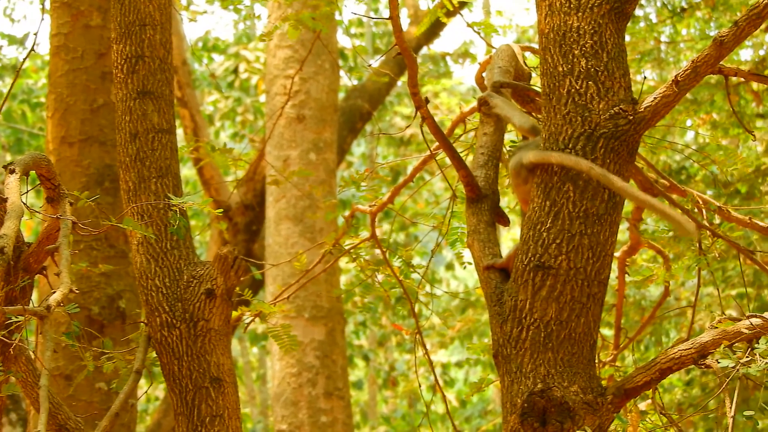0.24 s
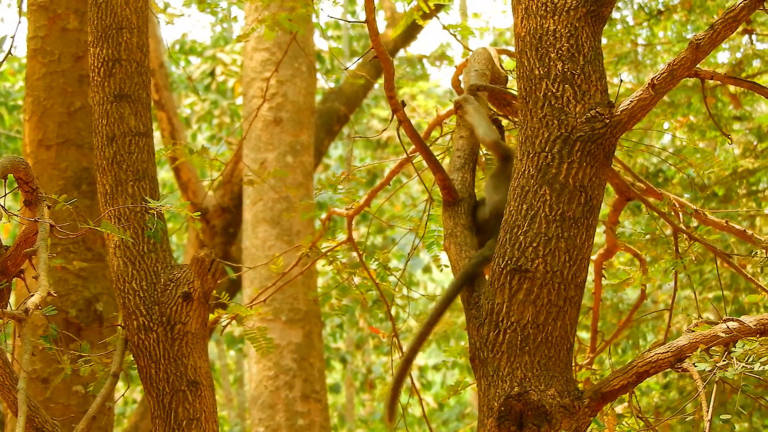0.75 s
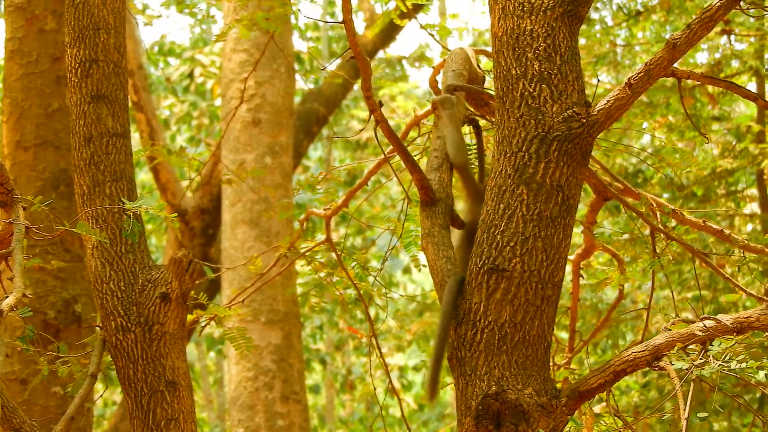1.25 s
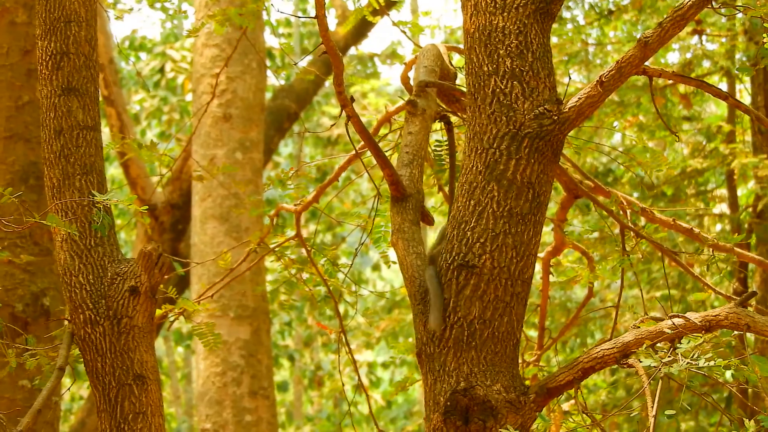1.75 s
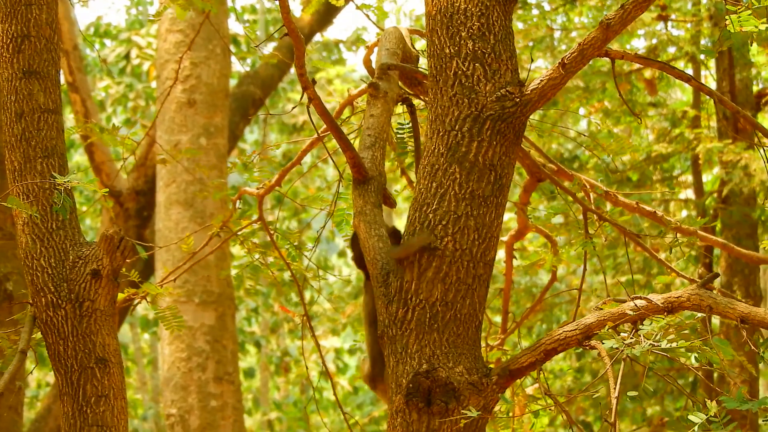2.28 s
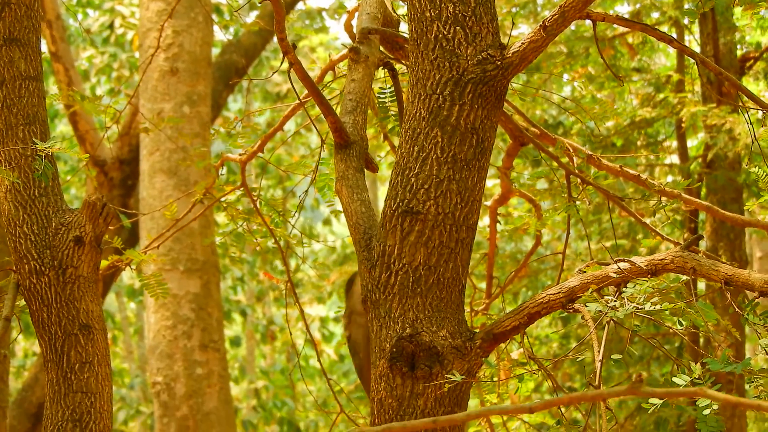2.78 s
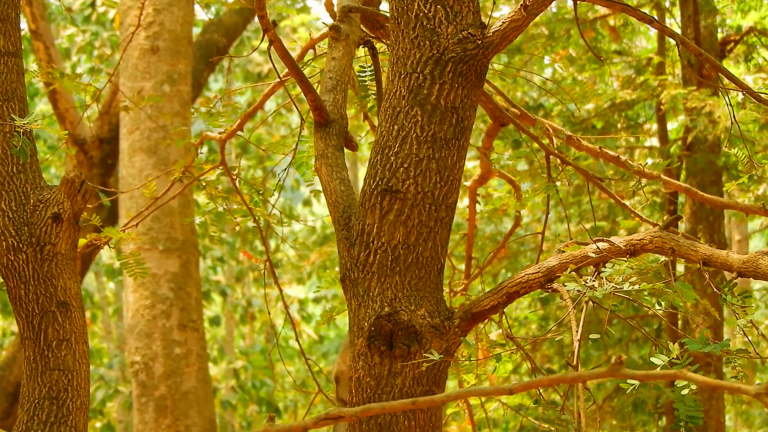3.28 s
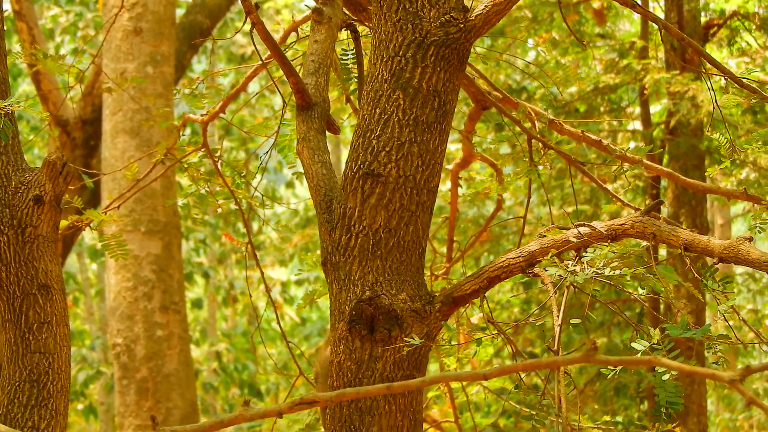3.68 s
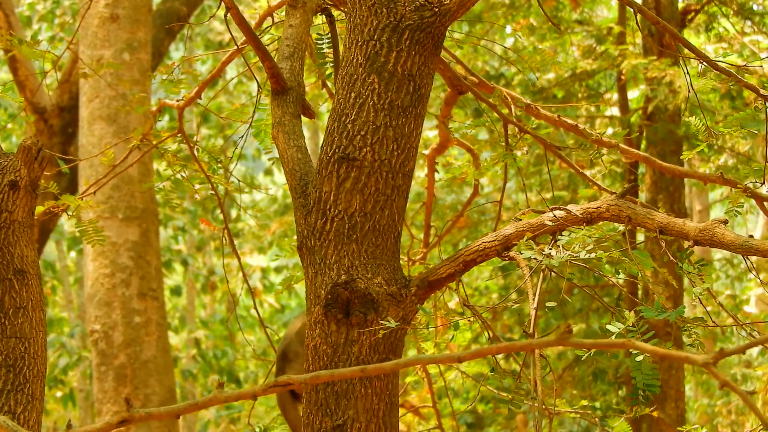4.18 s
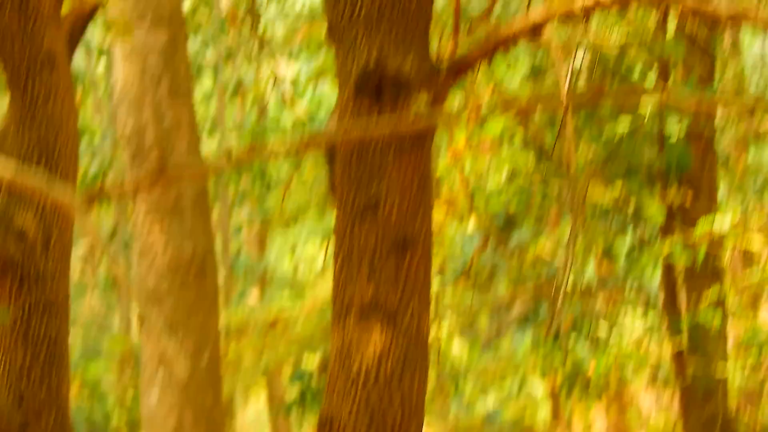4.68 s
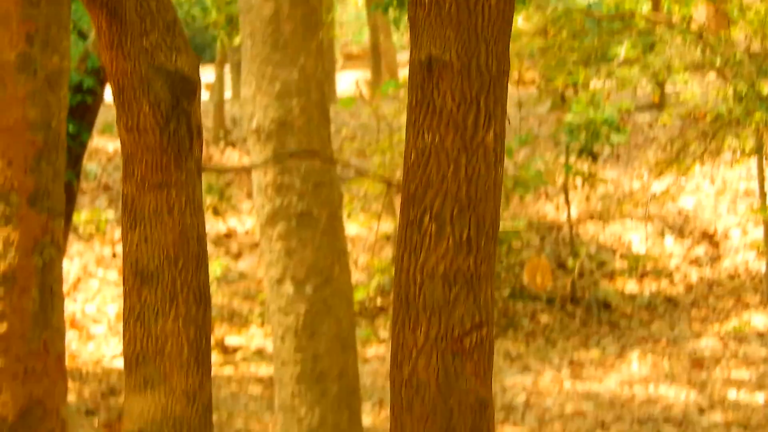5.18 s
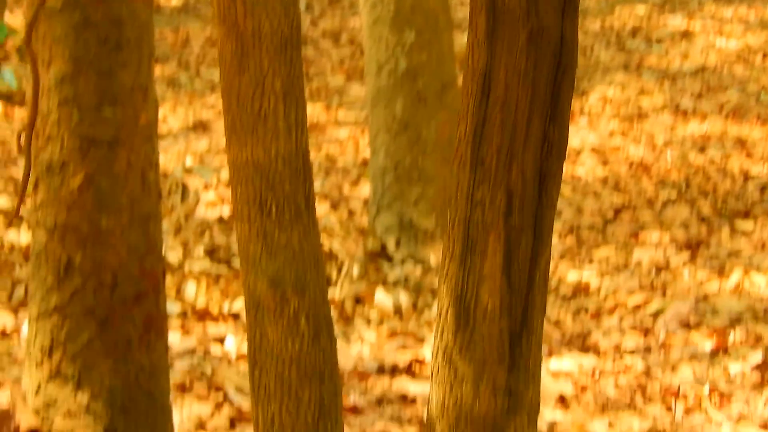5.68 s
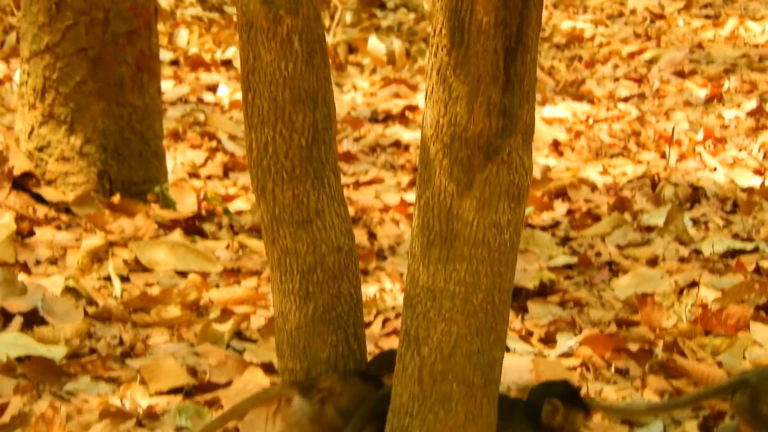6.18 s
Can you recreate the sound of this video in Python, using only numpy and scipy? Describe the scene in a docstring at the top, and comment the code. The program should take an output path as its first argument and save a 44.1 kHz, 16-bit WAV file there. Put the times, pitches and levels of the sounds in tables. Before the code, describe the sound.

In a dry forest, one close cicada buzzes continuously slightly left, within a wide, shrill wash of distant insects. A far engine throbs beneath low rumble and faint road noise. Unseen monkeys rustle foliage; a sharp cluster of twig snaps and leaf crunches comes early, then scattered smaller crackles and a late snap. A handheld stereo microphone catches soft air and one low handling bump.

```python
"""Cicadas in a dry forest

One cicada buzzes close by on the left: quick clicks ring a small drum-like skin, the tymbal.
Far insects, made of smeared clicks, noise and thin tones, merge into a shrill wash.
Spaced thumps make a far engine; shaped noise makes rumble, air, road, wind and one low handling bump.
Monkeys moving about rustle foliage, crunch leaves and snap twigs: short swells of noise, with leaf ticks.
"""
import sys
import numpy as np
from scipy import signal
from scipy.fft import rfft, irfft
from scipy.io import wavfile
from scipy.ndimage import uniform_filter1d

SR = 44100
rng = np.random.default_rng(int(sys.argv[2]) if len(sys.argv) > 2 else 0)


def master_out(mix):
    """Clip the mix to full scale and print it as 16-bit PCM to the path in sys.argv[1]."""
    frames = np.transpose(np.atleast_2d(mix))
    ceiling = np.clip(frames, -1, 1)
    pcm = np.round(ceiling * 32767).astype(np.int16)
    wavfile.write(sys.argv[1], SR, pcm)


N = 284004
TIME = np.arange(N) / SR  # s
FREQ = np.maximum(np.arange(N // 2 + 1) * SR / N, 1)  # Hz


def undb(db):
    """Turn decibels into gain."""
    return 10 ** (np.asarray(db) / 20)


def curves(table):
    """Join the points of each table column by straight lines in time."""
    s, *columns = np.transpose(table)
    return [np.interp(TIME, s, column) for column in columns]


def unit(x):
    """Scale so that the middle of the stereo image has an rms level of 1."""
    return x / np.std(np.atleast_2d(x).mean(axis=0))


def pan(db):
    """Give the gains of left and right for a level difference, left minus right."""
    return undb(np.array([[db], [-db]]) / 2)


def colour(points):
    """Draw a frequency response through points of pitch and level."""
    hz, db = np.transpose(points)
    return undb(np.interp(np.log(FREQ), np.log(hz), db))


def resonance(hz, width):
    """Let one band of pitches through, twice over for steep sides; width is that of a single pass."""
    return (1 + 1j * (FREQ / hz - hz / FREQ) * hz / width) ** -2


def joint_resonance(table):
    """Add the power of several resonances, leaving out their phase so that they sound together."""
    return np.sqrt(sum(np.abs(undb(db) * resonance(hz, width)) ** 2 for hz, width, db in table))


def filtered(x, response):
    """Apply a frequency response."""
    return irfft(rfft(x) * response, N)


def walk(rate):
    """Wander by chance: random levels, `rate` a second, smoothed twice; spread near 1."""
    hold = int(SR / rate)
    steps = np.repeat(rng.standard_normal(N // hold + 1), hold)
    smooth = uniform_filter1d(uniform_filter1d(steps, hold), hold)
    return 1.3 * smooth[:N]


def wide_noise(side_db):
    """Make stereo noise; side_db sets the left-right difference against the shared middle."""
    mid, side = rng.standard_normal((2, N))
    return mid + undb(side_db) * side * np.array([[1], [-1]])


def pulses(rate, jitter_s, scatter_db):
    """Make one pulse a cycle, each a little early or late and of its own size."""
    turns = np.cumsum(rate) / SR
    times = np.interp(np.arange(1, turns[-1]), turns, TIME)
    late, size = rng.standard_normal((len(times), 2)).T
    place = (times + jitter_s * late)[:, None] * SR
    # a short sinc places each pulse between samples
    taps = place.astype(int) + np.arange(-4, 6)
    out = np.zeros(N)
    np.add.at(out, taps % N, undb(scatter_db * size)[:, None] * np.sinc(taps - place))
    return out


def trunks(x, t60):
    """Blur a sound into echoes from the trees, different on each side, fading 60 dB in t60 seconds."""
    tail = rng.standard_normal((2, N)) * undb(-60 * TIME / t60)
    return unit(filtered(x, rfft(tail)))


def reflections(db, count):
    """Add fixed echoes off trunks to the direct sound, which combs the spectrum finely."""
    lag_s, size = rng.uniform(.006, .05, count), rng.standard_normal(count)
    response = np.zeros(N)
    response[0] = 1
    response[(lag_s * SR).astype(int)] = undb(db) * size / np.linalg.norm(size)
    return rfft(response)


def drifting(x, spread_hz):
    """Let the pitch of a narrow sound wander up and down."""
    turns = np.cumsum(spread_hz * walk(5)) / SR
    return np.real(signal.hilbert(x) * np.exp(2j * np.pi * turns))


# tone of the low rumble: f/Hz, relative level per Hz/dB
RUMBLE_TONE = [(20, -23), (32, -17), (45, -5), (54, -11), (70, 1), (110, -1.5), (140, 1.5), (175, .5),
               (205, -2), (260, -13), (400, -21.5), (800, -56)]
# the rumble sinks and comes back: t/s, level/dB
RUMBLE_LEVEL = [(0, -34.5), (2.3, -35.5), (3.5, -38), (5.3, -37.5), (6.44, -35)]


def low_rumble():
    """Bass-heavy noise, nearly the same on both sides."""
    db, = curves(RUMBLE_LEVEL)
    return unit(filtered(wide_noise(side_db=-16.0), colour(RUMBLE_TONE))) * undb(db)


# tone of the rush of air: f/Hz, relative level per Hz/dB
AIR_TONE = [(100, -3), (280, 2), (450, 1.5), (780, 0.5), (1100, -2.5), (1700, -4.5), (2800, -7.5),
            (4000, -11.5), (8000, -16.5)]
AIR_DB = -45  # level around which it wavers


def air_rush():
    """Soft, wide noise whose level wavers quickly."""
    return unit(filtered(wide_noise(side_db=-5.5), colour(AIR_TONE))) * undb(AIR_DB + 2.6 * walk(14))


# tyre noise ebbing on a far road: t/s, level/dB
ROAD_LEVEL = [(0, -43), (1, -45), (2, -47), (2.3, -51.5), (2.9, -47.5), (3.5, -60), (4.2, -55), (4.75, -57),
              (4.95, -50), (5.6, -56.5), (6.44, -56)]


def far_road():
    """Tyre noise is a broad band of noise around 772 Hz, with a wavering level."""
    db, = curves(ROAD_LEVEL)
    return unit(filtered(wide_noise(side_db=-12.5), resonance(772, 560))) * undb(db + 1.3 * walk(6.4))


def background():
    """Rumble, air and road together; trunks echo only the air and the road."""
    echoed = filtered(air_rush() + far_road(), reflections(db=-5.5, count=30))
    return (low_rumble() + echoed) * pan(2.4)


# low tone of both the wind and the bump on the microphone: f/Hz, relative level per Hz/dB
BUFFET_TONE = [(15, -26), (28, -17), (45, -4), (70, -1.5), (110, -6), (200, -32)]
DRAUGHT_DB, BUMP_DB = -51, -35  # light steady draught; top of the bump; both waver
BUMP_S, BUMP_RISE_S, BUMP_FALL_S = 4.88, 0.18, 0.088  # time of the top; slow build; fast drop


def wind_and_bump():
    """A draught buffets each side of the microphone on its own; one low bump comes as it is handled."""
    age = TIME - BUMP_S
    bump = undb(BUMP_DB) * np.exp(-np.maximum(-age / BUMP_RISE_S, age / BUMP_FALL_S))
    strength = np.hypot(undb(DRAUGHT_DB), bump) * undb(2 * walk(2.18))
    return unit(filtered(rng.standard_normal((2, N)), colour(BUFFET_TONE))) * strength


# level of the far engine: t/s, level/dB
ENGINE_LEVEL = [(0, -32.5), (1, -36), (2.5, -33), (3.3, -37), (4.5, -34.5), (5.7, -43), (6.44, -34.5)]
# resonances of its exhaust: f/Hz, width/Hz, relative level/dB
EXHAUST = [(65.7, 9.7, -1), (126.8, 58, 9.5), (157, 29, -21)]
FIRINGS_HZ, FIRINGS_WAVER = 21.8, .005  # firings per second; small share by which they waver


def engine():
    """Slow firings thump through the exhaust; distance leaves only the bass."""
    db, = curves(ENGINE_LEVEL)
    pipe = sum(undb(d) * resonance(hz, width) for hz, width, d in EXHAUST)
    rate = FIRINGS_HZ * (1 + FIRINGS_WAVER * walk(1))
    firings = pulses(rate, jitter_s=0.00022, scatter_db=0.9)
    return unit(filtered(firings, pipe)) * undb(db) * pan(1.31)


# click rates of the far cicadas, one each, around which they wander: f/Hz
CROWD_RATES = [402.4, 394, 341.6, 312.7, 269, 414.4, 357.3, 232, 373.4, 292, 387, 409, 328, 249]
CROWD_WAVER = .016  # share by which each rate slowly wanders
# pitches on which the far insects sing: f/Hz, width/Hz, relative level/dB
SONGS = [(4926, 120, -11.5), (5090, 130, -12.5), (5750, 110, -8.5), (5916, 280, -8), (6133, 136, -7.5),
         (6260, 136, -8.5), (6830, 180, -10), (7032, 192, -1.5), (7170, 134, -2), (7350, 140, -2),
         (7750, 75, 0), (7875, 190, 0.5), (8090, 144, 3), (8204, 190, -1), (8480, 217, -1),
         (8850, 150, -2.5), (9217, 124, -1), (9540, 135, -4), (9720, 250, -12), (10360, 290, -17.5)]
# broad noise under those songs: f/Hz, relative level per Hz/dB
SKIRT_TONE = [(3000, -35), (3900, -33.5), (4600, 0), (5500, 2), (6600, 3.5), (9000, 10), (10000, -9),
              (10800, -9), (11300, -54)]
# the chorus swells and eases as singers join and stop: t/s, level/dB
CHORUS_LEVEL = [(0, -21), (.25, -24), (.6, -22), (3.2, -22.5), (4.4, -21.5), (5.4, -22.5), (5.75, -24.5),
                (6.2, -22.5)]


def far_chorus():
    """The trees smear distant insects' clicks into shimmering bands that wander a little in pitch."""
    db, = curves(CHORUS_LEVEL)
    rates = [rate * (1 + CROWD_WAVER * walk(1.5) + .001 * walk(10)) for rate in CROWD_RATES]
    clicks = sum(pulses(rate, jitter_s=.00001, scatter_db=1.5) for rate in rates)
    crowd = trunks(clicks, t60=.2)
    crowd = unit(crowd + 0.25 * crowd[::-1])  # each side also hears some of the other
    drive = crowd + undb(-2.0) * wide_noise(side_db=-4.5)
    songs = drifting(filtered(drive, joint_resonance(SONGS)), spread_hz=9)
    skirt = undb(-17.5) * filtered(wide_noise(side_db=-8.0), colour(SKIRT_TONE))
    echoed = filtered(songs + skirt, reflections(db=-11.0, count=45))
    return unit(echoed) * undb(db) * pan(2.25)


# thin tones of single far insects: f/Hz, level of the tone's peak/dB; both waver
WHINES = [(5017, -54), (5739, -50), (6148, -49), (7144, -43), (7757, -41), (8150, -39), (8818, -43),
          (9227, -45), (9507, -47)]
WHINE_WAVER_HZ = 8  # size of both the slow and the fast wander in pitch


def whines():
    """A few far insects each hold one thin tone that wavers in pitch and loudness."""
    out = np.zeros((2, N))
    for hz, db in WHINES:
        pitch = hz + WHINE_WAVER_HZ * walk(9) + WHINE_WAVER_HZ * walk(120)
        turns = np.cumsum(pitch) / SR
        arrival = rng.standard_normal((2, 1))  # a phase of its own on each side
        out += undb(db + 2 * walk(6)) * np.sin(2 * np.pi * turns + .5 * arrival)
    return out * pan(2.0)


# the foliage rustles on while the monkeys move through it: t/s, level/dB
RUSTLE_LEVEL = [(0, -50.5), (.1, -47.5), (.3, -52), (1, -48), (1.5, -43), (1.7, -54), (2.7, -50),
                (3.7, -57), (4.1, -47.5), (4.32, -42), (4.45, -52), (4.82, -56), (4.92, -42), (5.07, -41),
                (5.25, -44.5), (5.32, -50), (5.42, -42.5), (5.55, -56), (6.1, -58), (6.44, -56)]
# tone of brushed foliage: f/Hz, relative level per Hz/dB
FOLIAGE_TONE = [(200, -14), (500, -5), (1300, -1.5), (2800, 1.5), (4200, 2), (7000, -10), (11000, -13)]
TICKS_PER_S, TICK_SPREAD_DB = 130, 5  # average count of leaf ticks; how unequal they are
HISS_DB, TICK_DB = -1.0, -5  # hiss and ticks against the rustle level


def foliage():
    """Brushed leaves hiss in uneven flurries, and single ones tick at chance moments."""
    db, = curves(RUSTLE_LEVEL)
    flurries = undb(db + 2.2 * walk(45))
    chance, size = rng.random(N), np.minimum(rng.exponential(size=N), 3)
    ticks = (chance < TICKS_PER_S / SR) * undb(TICK_SPREAD_DB * size)
    leaf = colour(FOLIAGE_TONE)
    ticks = unit(filtered(ticks, leaf * reflections(db=-6.0, count=30)))
    hiss = unit(filtered(wide_noise(side_db=-11.0), leaf))
    return (undb(HISS_DB) * hiss + undb(TICK_DB) * ticks) * flurries * pan(0.5)


# steps in dry leaves: t/s, level/dB (before CRUNCH_DB), time the foot presses/s, decay/s,
# thud of the ground against that level/dB, pitch of the crunch f/Hz
STEPS = [(0.706, -41.5, 0.018, 0.016, -17, 3300), (.974, -42.5, .02, 0.025, -17, 3300),
         (1.2, -39.5, 0.044, .02, -16, 3200), (1.326, -39.5, 0.014, .012, 7, 1400),
         (1.342, -30.5, 0.027, 0.0068, -7.5, 2050), (1.385, -45, 0.02, 0.025, -14, 2000),
         (1.434, -40.5, 0.026, 0.037, -7, 2000), (2.822, -40, 0.044, 0.013, -24, 2100),
         (3.876, -41, 0.021, 0.0073, -19, 2300), (3.937, -45.5, 0.02, 0.02, -17, 2300),
         (4.205, -40, 0.08, 0.025, -24, 2600), (4.555, -43, 0.023, .015, -22, 2800),
         (4.89, -40, 0.033, 0.04, -7, 2300), (5.205, -43, 0.025, 0.018, -20, 3000),
         (6.183, -43, .017, 0.033, -2, 2400), (6.23, -47, 0.055, 0.05, -3, 3000),
         (6.373, -51, .014, 0.028, -20, 2780)]
# tone of a crunched leaf: f/Hz, relative level per Hz/dB
LEAF_TONE = [(250, -18), (700, -0.5), (1400, 2.5), (2600, 4.5), (3500, 8), (5000, 4.5), (9000, -2.5),
             (12000, 8)]
CRUNCH_DB = 4.0  # lift of all crunches
LANDING_SHARE = 0.19  # the foot lands over this share of its pressing time
LEAF_FALL_DB_PER_OCT = 3.5  # a crunch weakens away from its pitch


def leaves():
    """Each step crushes dry leaves in a swell of tiny cracks, with a soft thud of the ground."""
    sizes_hz = np.geomspace(400, 9000, 9)  # leaves of different size crack at different pitches
    pushes, shares, weight = [], [], np.zeros(N)
    for start, db, press, decay, thud_db, hz in STEPS:
        age = TIME - start
        landing = np.clip(age / (LANDING_SHARE * press), 0, 1)
        push = undb(db) * landing * np.exp(-np.maximum(age - press, 0) / decay)
        pushes.append(push)
        shares.append(undb(-LEAF_FALL_DB_PER_OCT * np.abs(np.log2(sizes_hz / hz))))
        weight = np.hypot(weight, push * undb(thud_db))
    # add the power of all steps for each leaf size
    crushes = np.sqrt(np.square(shares).T @ np.square(pushes))
    leaf = colour(LEAF_TONE)
    cracks = []
    for hz in sizes_hz:
        flicker = undb(3.1 * walk(600) + 2.1 * walk(130))  # each size at its own moments
        band = leaf * resonance(hz, 0.44 * hz)
        # higher bands are wider: the root evens out their power
        cracks.append(filtered(wide_noise(side_db=-9.0) * flicker, band) / np.sqrt(hz))
    loudness = np.std(sum(cracks).mean(axis=0))
    crunch = sum(c * crush for c, crush in zip(cracks, crushes)) / loudness * undb(CRUNCH_DB)
    thud = unit(filtered(wide_noise(side_db=-12.0), resonance(260, 430))) * weight
    return filtered(crunch + thud, reflections(db=-10.5, count=30)) * pan(0.31)


# twigs that snap underfoot: t/s, level before rise and decay shape it/dB
SNAPS = [(.981, -36), (1.19, -33), (1.224, -34), (1.237, -32), (1.329, -26), (1.349, -19.5), (1.358, -23.5),
         (1.369, -19), (1.398, -29), (1.435, -29), (1.445, -26), (1.462, -29), (1.519, -25.5), (2.826, -30),
         (2.841, -23), (2.853, -28), (3.886, -25), (3.899, -28), (4.254, -33), (4.282, -30), (4.645, -30),
         (4.905, -33), (5.06, -35), (5.217, -32), (5.412, -31), (6.199, -35), (6.254, -36), (6.38, -26.5),
         (6.433, -21.5)]
# what a twig rings with: f/Hz, width/Hz, relative level/dB
TWIG = [(1330, 420, 5), (2270, 870, 4.5), (2820, 610, 4), (6000, 9100, -1.5)]
SNAP_RISE_S, SNAP_S = .0013, 0.0034  # how long the fibres take to give; how fast a snap dies away


def twigs():
    """A dry twig breaks in an instant and rings briefly; the trunks throw the snap back."""
    breaks = np.zeros(N)
    for start, db in SNAPS:
        age = TIME - start
        breaks += undb(db) * np.clip(age / SNAP_RISE_S, 0, 1) * np.exp(-np.abs(age) / SNAP_S)
    snaps = unit(filtered(wide_noise(side_db=-14.0), joint_resonance(TWIG))) * breaks
    return filtered(snaps, reflections(db=-6.5, count=30))


# now and then the near cicada falters: t/s, drop in click rate f/Hz
FALTERS = [(0.819, 11), (1.17, 11), (2.2, 7), (3.86, 9), (4.08, 9), (4.861, 7), (6.25, 7)]
FALTER_S = .04  # from the deepest point until the drop has shrunk to about a third
CLICKS_HZ, CLICKS_WAVER = 402.5, .008  # clicks per second; small share by which they waver


def click_rate():
    """The near cicada's pace is nearly steady, with a brief sag at each falter."""
    sag = sum(depth * np.exp(-((TIME - s) / FALTER_S) ** 2) for s, depth in FALTERS)
    return CLICKS_HZ * (1 + CLICKS_WAVER * walk(12)) - sag


# resonances of its tymbal: f/Hz, width/Hz, relative level/dB
TYMBAL = [(8370, 400, 0), (8220, 780, 0.5), (8810, 470, -2), (9330, 390, -8), (9340, 260, -7)]
# the near cicada: t/s, level of the direct sound/dB, left minus right/dB
CICADA_LEVEL = [(0, -22.5, 1.5), (1.5, -22.5, 2), (2.7, -22, 0.5), (3.7, -20.5, 2.5), (4.5, -24, 1.5),
                (4.65, -26, 3), (5, -22.5, 3.5), (5.8, -23, 4), (6.44, -23, 2)]


def near_cicada():
    """Buckling ribs click some 400 times a second and ring the tymbal; the trees scatter the buzz."""
    clicks = pulses(click_rate(), jitter_s=.000025, scatter_db=1.5)
    body = joint_resonance(TYMBAL)
    buzz = unit(filtered(clicks, body * reflections(db=-20.0, count=30)))
    lag_s = .00003  # the sound reaches the left side first
    right = filtered(buzz, np.exp(-2j * np.pi * FREQ * lag_s))
    direct = np.array([buzz, right])
    scattered = undb(-14.0) * trunks(buzz, t60=0.14)
    db, pan_db = curves(CICADA_LEVEL)
    sides_db = np.array([pan_db, -pan_db]) / 2
    return (direct + scattered) * undb(db + 0.25 * walk(24.74) + sides_db)


def scene():
    """Everything heard from one spot among the trees."""
    surroundings = background() + wind_and_bump() + engine() + far_chorus() + whines()
    monkeys = foliage() + leaves() + twigs()
    return surroundings + monkeys + near_cicada()


TOP_HZ = 10950


def record(dry):
    """The camera cuts the treble steeply above TOP_HZ."""
    return signal.sosfilt(signal.ellip(12, .1, 80, TOP_HZ, fs=SR, output="sos"), dry)


dry = scene()
out = record(dry)
master_out(out)
```